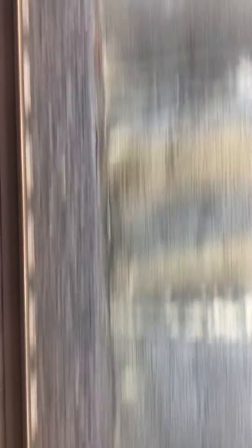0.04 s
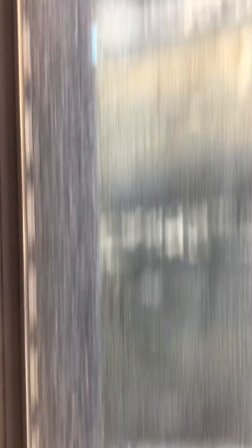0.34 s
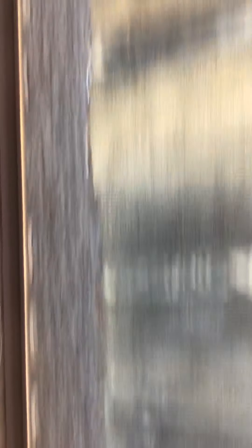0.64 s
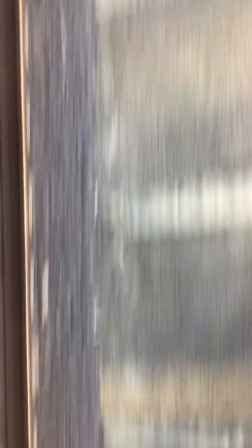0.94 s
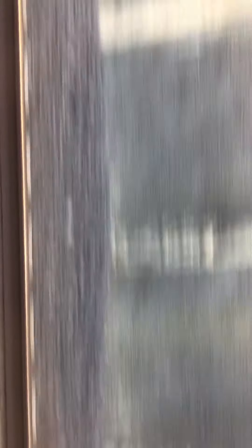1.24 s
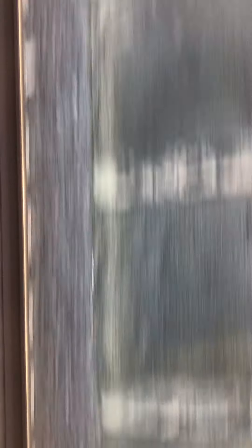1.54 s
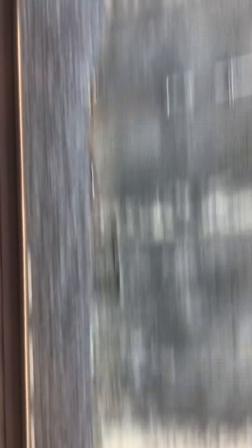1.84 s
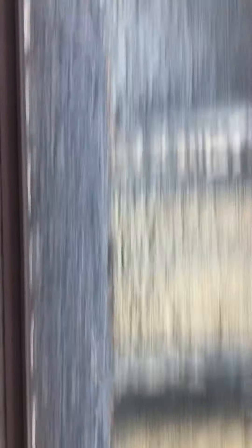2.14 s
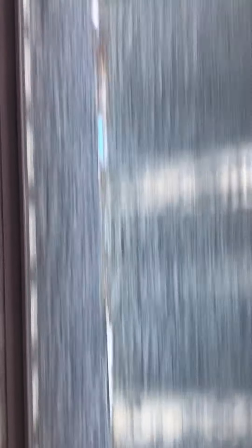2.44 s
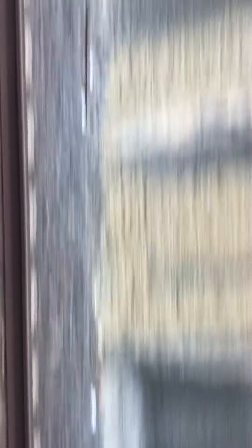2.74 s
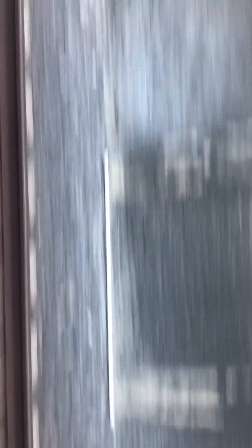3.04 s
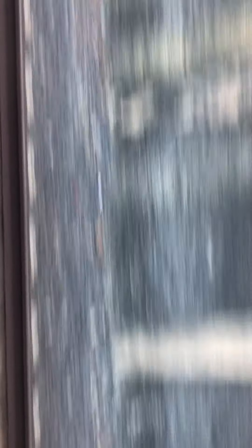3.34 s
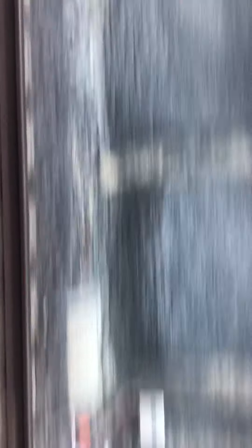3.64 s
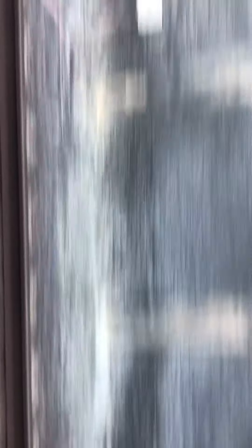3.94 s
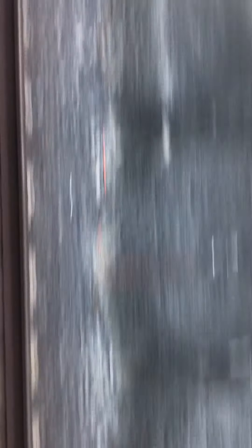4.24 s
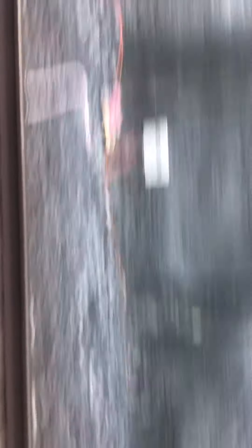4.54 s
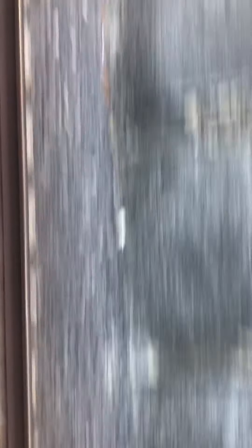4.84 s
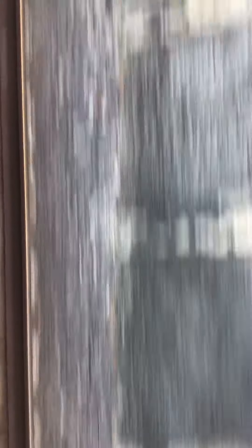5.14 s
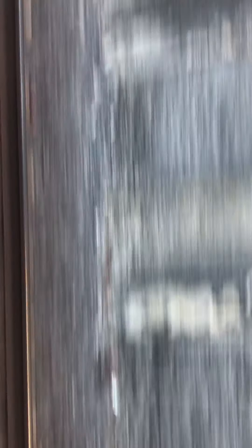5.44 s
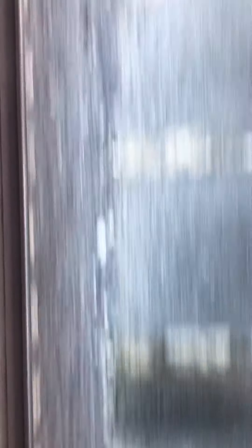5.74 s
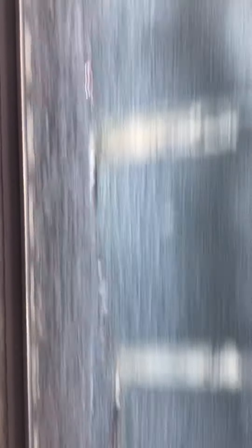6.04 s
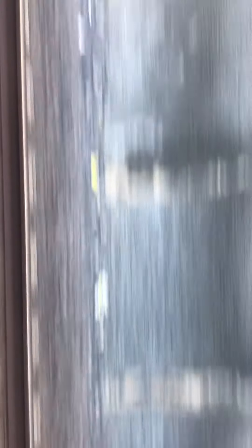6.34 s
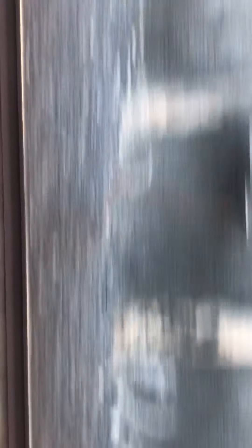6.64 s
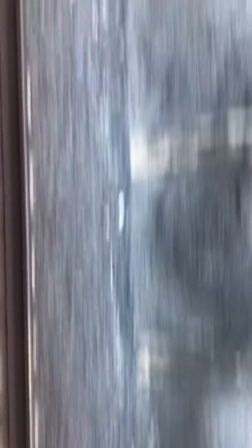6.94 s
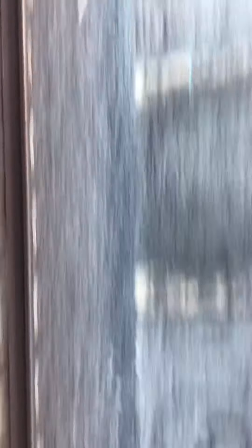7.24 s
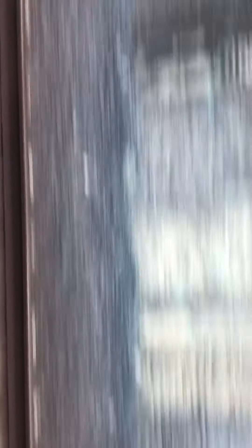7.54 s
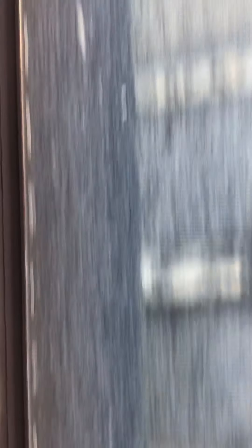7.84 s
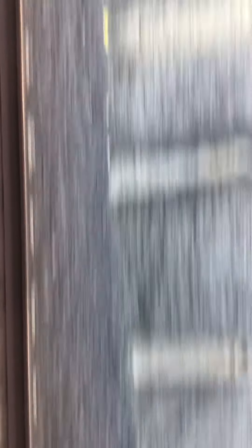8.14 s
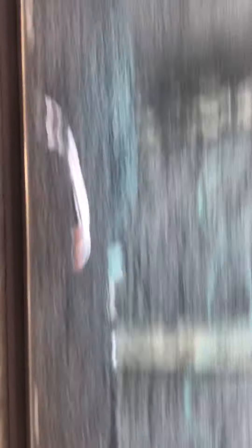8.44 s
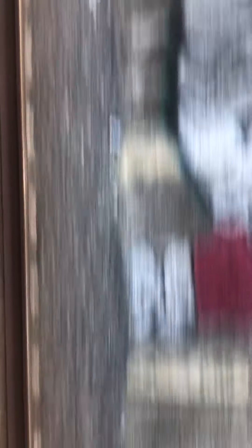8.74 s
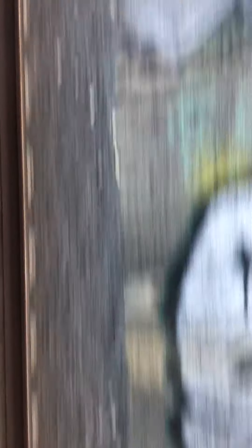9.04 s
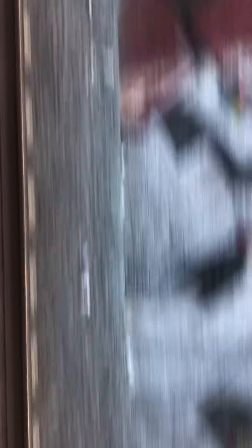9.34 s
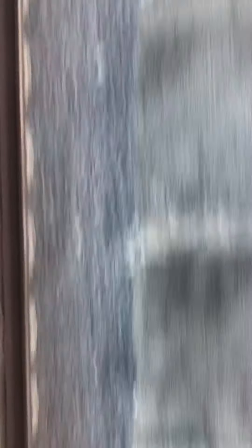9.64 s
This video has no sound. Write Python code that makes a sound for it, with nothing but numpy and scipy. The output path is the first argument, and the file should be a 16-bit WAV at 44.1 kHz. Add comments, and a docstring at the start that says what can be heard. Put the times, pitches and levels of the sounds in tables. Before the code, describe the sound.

Inside an electric train running at speed, the carriage booms and rumbles with a low, uneven throb. Wheels and rails roar steadily through the window with a light hiss, and dull knocks come now and then from under the floor. The steel wheels ring softly and sing brief notes where they rub, while the drive gears whine faintly behind. The microphone is at a window seat.

```python
"""Inside an electric train running at speed beside a stone wall, one microphone at a window seat.
Close all round, uneven track shakes the car body into a low boom and rumble, and from under the floor
come a few dull knocks of the bogie. Wheels and rails roar through the window, the steel wheels ring
and now and then sing where they rub, and far back in the sound the drive gears whine faintly."""
import sys
import numpy as np
from scipy import signal
from scipy.fft import rfft, irfft, next_fast_len
from scipy.io import wavfile
from scipy.ndimage import uniform_filter1d

SR = 44100
rng = np.random.default_rng(int(sys.argv[2]) if len(sys.argv) > 2 else 0)


def materialize(psi):
    """Save the field psi as 16-bit PCM at rate SR to the path in sys.argv[1].

    A 1-D psi becomes a single channel; in a 2-D psi each row is a channel.
    """
    bounded = np.clip(np.atleast_2d(psi).T, -1, 1)
    quanta = np.round(bounded * 32767).astype(np.int16)
    wavfile.write(sys.argv[1], SR, quanta)


N = 431738

# unevenness of the track under the car: t/s, level/dB about its mean
TRACK_UNEVENNESS = [(0, -1.5), (0.35, 0.5), (0.7, 0), (0.95, 2.5), (1.6, -2), (2.25, 1.5), (3.2, -1.5),
                    (3.55, -0.5), (4.2, 0), (4.9, 1), (5.7, 0), (6.8, -2), (7.15, 0.5), (7.8, 0.5),
                    (8.0, 0), (8.55, 0.5), (9.55, -1), (9.75, 4.5)]
# slow sway of the car on its springs: t/s, boom level/dB on average track
CAR_SWAY = [(0.0, -24), (1.6, -21), (3.2, -22), (5.2, -23.5), (6.0, -25), (7.3, -24.5), (8.0, -22),
            (9.2, -21), (9.75, -28.5)]
# brief swells and sags in boom, floor rumble and panel drone: t/s, boom/dB, floor/dB, panels/dB
BRIEF_SWELLS = [(0.2, 3.5, 5, 2), (0.88, 0, -0.5, 3.5), (0.99, 3, 3, 4), (1.1, 0.5, 2.5, 2),
                (1.47, 3.5, 0.5, 1.5), (1.85, 2.5, 1, -1), (3.55, 7.5, 2.5, -1.5), (3.77, 6, 2, 1.5),
                (4.02, 3.5, 1, 1), (4.46, -0.5, 2, 1), (4.58, 0, 3.5, 3.5), (4.84, 1, 2, -1.5),
                (4.95, 5, 3.5, 0.5), (5.14, -1.5, -1, -2), (5.47, 5, -1, 1), (6.25, 2, 0.5, 2),
                (7.27, 1, 2, 0), (7.94, 4.5, 3.5, -3), (8.09, 2, 0, -1.5), (8.42, 5, 0, 1),
                (8.52, -8, 6.5, 0), (8.63, 3.5, 2.5, -3), (8.86, 6, -2, -3), (9.27, 4.5, 2.5, 2.5),
                (9.69, 0, 2, -2), (9.77, 6, -0.5, 5.5)]
# moments when the shaking lets up: t/s, boom drop/dB, floor drop/dB
LULLS = [(0.5, 0, 2), (0.73, 6, 2.5), (1.25, 6, -3.5), (1.67, 7, -0.5), (2.05, 1, 2.5), (2.57, 1, 3.5),
         (3.15, 2, 5.5), (4.15, 9, 0.5), (4.38, 2, 5), (4.68, 0.5, 2), (5.03, 0.5, 0), (5.31, 5, 2.5),
         (6.62, 2.5, 3.5), (6.94, -1, 4.5), (7.12, 10, -2), (7.85, 5, 11), (8.3, 7, 0.5), (8.74, 4, 0),
         (9.41, 4.5, -0.5)]
# spectra of the shell around the microphone, the floor below, the panels beside it: f/Hz, level/dB
SHELL_SPECTRUM = [(10, -46.5), (16, -22.5), (21, -6.5), (28, -2.5), (42, -0.5), (52, 0), (57, -6),
                  (70, -38)]
FLOOR_SPECTRUM = [(48, -27), (57, -11.5), (63, 0.5), (78, -0.5), (104, -3.5), (120, -7.5), (134, -10.5),
                  (148, -18), (172, -40), (300, -59.5)]
PANEL_SPECTRUM = [(105, -23), (138, 2.5), (148, 3), (160, 1.5), (185, -0.5), (235, -4.5), (300, -4.5),
                  (365, -11), (400, -15), (520, -41.5)]
# resonances that stand out of each: f/Hz, width/Hz, lift/dB
SHELL_MODES = [(25.8, 2.6, 5.5), (31.8, 2.1, 9.5), (45.9, 3.2, 8), (52.1, 7.3, 5)]
FLOOR_MODES = [(90.4, 4.6, 3.5), (113.6, 7, 4.9), (130.6, 4, 7)]
PANEL_MODES = [(186, 33, 3.1), (282.6, 18, 3.7), (337, 14, 3.4)]

def car_body(floor_level_db=-22.5, panel_level_db=-33.5, swell_half_s=0.05, lull_half_s=0.055):
    """All round the seat: the track shakes shell, floor and wall panels; their beating modes throb."""
    (track_db,), (sway_db,) = in_time(TRACK_UNEVENNESS), in_time(CAR_SWAY)
    boom_swell, floor_swell, panel_swell = swells(BRIEF_SWELLS, swell_half_s)
    boom_lull, floor_lull = swells(LULLS, lull_half_s)
    shaking_db = 0.5 * drift(rate_hz=6)
    # each part follows its own share of the track's swing
    boom_db = sway_db + 0.99 * track_db + boom_swell - boom_lull + shaking_db
    floor_db = floor_level_db + track_db + floor_swell - floor_lull + shaking_db
    panel_db = panel_level_db + 0.81 * track_db + panel_swell
    boom = from_db(boom_db) * steady(vibration(SHELL_SPECTRUM, SHELL_MODES), span_s=0.2)
    floor = from_db(floor_db) * steady(vibration(FLOOR_SPECTRUM, FLOOR_MODES), span_s=0.28)
    panels = from_db(panel_db) * steady(vibration(PANEL_SPECTRUM, PANEL_MODES), span_s=0.17)
    return boom + floor + panels


# spectra of rail roar and wheel hiss, from inside the window: f/Hz, level/dB
RAIL_SPECTRUM = [(260, -27.5), (380, 0.5), (450, 3.5), (520, -1.5), (700, 0.5), (900, 0.5), (1040, -3),
                 (1110, -5), (1350, -6), (1570, -9.5), (1750, -27), (2500, -49)]
WHEEL_SPECTRUM = [(1100, -34), (1600, -1.5), (1720, 0), (2050, -2.5), (2400, -5), (2800, -7), (3050, -10.5),
                  (4100, -13.5), (5050, -16), (5900, -16), (6500, -19), (7000, -25), (7400, -31),
                  (9000, -64.5)]
# resonances that stand out of each: f/Hz, width/Hz, lift/dB
RAIL_MODES = [(404, 13, 1.3), (430, 23, 1.5), (540, 16, 2.5), (638, 28, 2.6), (676, 16, 1.3),
              (960, 38, 2.3), (1050, 27, 3.2), (1208, 18, 4), (1278, 30, 2.8), (1440, 26, 2.6)]
WHEEL_MODES = [(1810, 85, 3.5), (1933, 100, 3), (2185, 84, 2.4), (2596, 60, 3.3), (2697, 74, 6),
               (3500, 200, 5), (3700, 170, 4.6), (4420, 280, 5.2), (4690, 110, 3), (5450, 300, 2.2),
               (5800, 200, 1.9)]
# short rough patches of rail that swell the roar: t/s, lift/dB
ROUGH_PATCHES = [(0.98, 2), (2.58, 3), (3.99, 3), (7.27, 1.6), (9.13, 1.5), (9.78, 2.5)]
# wheel hiss at the seat: t/s, level/dB
WHEEL_HISS = [(0.0, -43.5), (0.55, -44), (0.95, -43), (1.7, -43.5), (2.55, -42.5), (4.1, -42.6),
              (5.2, -43.5), (6.1, -43), (6.75, -44), (7.7, -43), (8.95, -43.5), (9.75, -43)]

def wheels_on_rails(rail_level_db=-37, track_share=0.18, flutter_db=0.45):
    """Through the window: roughness at the contact excites rail and wheel, so both flutter in step."""
    (track_db,), (hiss_db,) = in_time(TRACK_UNEVENNESS), in_time(WHEEL_HISS)
    (patch_db,) = swells(ROUGH_PATCHES, half_s=0.04)
    contact_db = flutter_db * drift(rate_hz=14)
    rail_db = rail_level_db + track_share * track_db + patch_db
    roar = from_db(rail_db) * steady(vibration(RAIL_SPECTRUM, RAIL_MODES), span_s=0.25)
    hiss = from_db(hiss_db) * steady(vibration(WHEEL_SPECTRUM, WHEEL_MODES), span_s=0.27)
    return from_db(contact_db) * (roar + hiss)


# flaws in the rail passing under the bogie: t/s, push level/dB, contact time/s
RAIL_FLAWS = [(0.212, -20, 0.0032), (0.631, -22.5, 0.0026), (0.829, -24, 0.003), (0.872, -20.5, 0.0046),
              (0.948, -20, 0.0044), (1.058, -19.5, 0.0028), (1.162, -21.5, 0.0046), (1.484, -22, 0.0038),
              (2.125, -20, 0.0046), (2.205, -17, 0.0059), (3.52, -16.5, 0.0039), (4.457, -21, 0.0018),
              (4.538, -28, 0.0016), (4.572, -28, 0.0014), (4.607, -25, .0034), (6.068, -17.5, 0.0032),
              (6.404, -19, .005), (6.465, -18, 0.0052), (7.083, -18, 0.0053), (8.231, -24, .003),
              (8.515, -23.5, .003), (9.016, -14, 0.0066), (9.65, -20, .0042), (9.756, -15.5, 0.004)]
# what a knock rings with: f/Hz, level/dB relative to the push, t60/s
BOGIE_MODES = [(162, -10.5, 0.2), (179, -7, 0.19), (210, -5, 0.13), (241, -3, 0.09), (287, -7.5, 0.06),
               (332, -17.5, .12)]

def bogie_knocks(scatter_db=2.0):
    """Under the floor: each flaw strikes the bogie's modes, duller the longer the contact."""
    chance_db = rng.normal(0, scatter_db, (len(RAIL_FLAWS), len(BOGIE_MODES)))
    out = np.zeros(N)
    for k, (hz, mode_db, t60) in enumerate(BOGIE_MODES):
        force = np.zeros(N)
        for (s, push_db, contact_s), luck_db in zip(RAIL_FLAWS, chance_db[:, k]):
            push, start = np.hanning(int(contact_s * SR)), int(s * SR)
            force[start:start + len(push)] += from_db(push_db + mode_db + luck_db) * push / push.sum()
        out += ring(force, hz, t60)
    return out


# brief notes of wheels rubbing on the rail: t/s, half length/s, f/Hz, level/dB
WHEEL_NOTES = [(0.88, .12, 443, -47), (1.64, .07, 447, -47), (1.903, 0.08, 445, -43.5),
               (2.583, 0.083, 442, -40), (2.56, .14, 700, -49), (2.95, 0.37, 952, -50),
               (3.427, 0.11, 546, -47), (3.5, .25, 960, -50), (4.2, .22, 687, -51), (5.5, 0.18, 667, -51),
               (5.95, .25, 950, -52), (7.2, .2, 663, -52.5), (8.15, 0.2, 686, -49), (9.13, .14, 406, -46),
               (9.218, .15, 1040, -51)]

def wheel_sings(waver_share=0.005):
    """Outside, down at the rail: a rubbing wheel locks onto one wavering note that swells and dies."""
    t = np.arange(N) / SR
    wavering_t = np.cumsum(1 + waver_share * drift(rate_hz=15)) / SR
    out = np.zeros(N)
    for s, half_s, hz, level_db in WHEEL_NOTES:
        near = np.abs(t - s) < 3 * half_s
        envelope = from_db(level_db) * np.exp(-((t[near] - s) / half_s) ** 2)
        out[near] += envelope * np.sqrt(2) * np.sin(2 * np.pi * (hz * wavering_t[near] + rng.random()))
    return out


# whine at the seat as the load on the gears changes: t/s, f/Hz, level/dB
GEAR_WHINE = [(0.0, 488.4, -58), (0.28, 490.7, -47), (0.53, 489.8, -43.5), (0.72, 490.1, -50),
              (0.9, 490.2, -40), (1.05, 490, -54), (1.22, 489, -47), (1.45, 489.2, -58),
              (2.05, 487.6, -55.5), (2.3, 494.1, -40.5), (2.5, 491, -50.5), (3.0, 490.6, -48.5),
              (3.6, 489.4, -55.5), (4.0, 488, -49), (4.3, 487, -60), (4.52, 487.4, -46), (4.8, 485, -57),
              (4.96, 484.6, -43), (5.14, 487, -44), (5.5, 487.7, -51.5), (5.76, 486.8, -52),
              (5.9, 490.5, -39), (6.12, 489, -55.5), (6.4, 488, -46.5), (6.8, 487, -49.5),
              (7.1, 486.6, -50.5), (7.65, 485, -43.5), (7.87, 485.8, -58), (8.07, 483.7, -44.5),
              (8.3, 488, -48), (8.8, 488.3, -46.5), (9.22, 489.4, -47), (9.46, 488, -40), (9.62, 489, -47),
              (9.77, 488, -39.5)]

def gear_whine(waver_hz=4.5, flicker_db=4.0):
    """Faint behind the roar: one tone from the meshing teeth, wavering in pitch and strength."""
    pitch_hz, load_db = in_time(GEAR_WHINE)
    phase = 2 * np.pi * np.cumsum(pitch_hz + waver_hz * drift(rate_hz=19)) / SR
    flicker = from_db(flicker_db * drift(rate_hz=9.7))
    return from_db(load_db) * steady(flicker * np.sin(phase), span_s=0.2)


# lightly damped modes of the wheel discs: f/Hz, width/Hz, level/dB
DISC_MODES = [(1796, 10, -60.5), (1839, 22, -59), (1895, 20, -63), (1945, 18, -63.5), (2676, 23, -62),
              (3390, 12, -65.5), (3465, 14, -67.5), (3490, 16, -68), (4410, 24, -71), (4450, 16, -70.5),
              (6285, 36, -76)]

def wheel_ring(swell_db=0.5):
    """Farthest back: rolling keeps the steel discs ringing, each mode swelling a little on its own."""
    out = np.zeros(N)
    for centre, width, level_db in DISC_MODES:
        tone = coloured_noise(lambda hz: -20 * np.log10(1 + ((hz - centre) / width) ** 2))
        out += from_db(level_db + swell_db * drift(rate_hz=1.2)) * steady(tone, span_s=0.4)
    return out


def from_db(db):
    """Decibels to gain."""
    return 10 ** (np.asarray(db) / 20)


def rms_one(x):
    """Scale to unit rms."""
    return x / np.sqrt(np.mean(x ** 2) + 1e-20)


def in_time(rows):
    """One value per sample for each column after t/s."""
    times, *columns = np.transpose(rows)
    return [np.interp(np.arange(N) / SR, times, column) for column in columns]


def swells(rows, half_s):
    """For each dB column after t/s, a curve with a bell-shaped rise around every listed time."""
    t = np.arange(N) / SR
    times, *columns = np.transpose(rows)
    bells = [np.exp(-np.minimum(((t - s) / half_s) ** 2, 20)) for s in times]
    return [sum(db * bell for db, bell in zip(column, bells)) for column in columns]


def coloured_noise(gain_db_at):
    """Noise of unit rms whose spectrum in dB is the given function of frequency."""
    size = next_fast_len(N, real=True)
    hz = np.maximum(np.fft.rfftfreq(size, 1 / SR), 1)
    spectrum = rfft(rng.standard_normal(size)) * from_db(gain_db_at(hz))
    return rms_one(irfft(spectrum, size)[:N])


def drift(rate_hz):
    """Random wander of unit rms, mostly slower than rate_hz."""
    return coloured_noise(lambda hz: -20 * np.log10(1 + (hz / rate_hz) ** 2))


def vibration(spectrum, modes):
    """A structure shaken at random: a broad spectrum, lifted around each resonance; unit rms."""
    points_hz, points_db = np.transpose(spectrum)

    def response_db(hz):
        broad = np.interp(np.log(hz), np.log(points_hz), points_db, right=-np.inf)
        return broad + sum(lift / (1 + (2 * (hz - centre) / width) ** 2) for centre, width, lift in modes)
    return coloured_noise(response_db)


def steady(x, span_s):
    """Even out swells slower than span_s and keep the fast flutter; unit rms."""
    power = uniform_filter1d(x ** 2, int(span_s * SR))
    return rms_one(x / np.sqrt(np.abs(power) + 1e-9))


def ring(force, hz, t60):
    """One damped mode: a unit push sets a sine of height 1 ringing."""
    decay, step = from_db(-60 / (t60 * SR)), 2 * np.pi * hz / SR
    return signal.lfilter([0, np.sin(step)], [1, -2 * decay * np.cos(step), decay ** 2], force + 1e-18)


def scene():
    """Everything as it reaches the window seat, in mono."""
    mix = car_body() + bogie_knocks() + wheels_on_rails() + wheel_ring() + wheel_sings() + gear_whine()
    return mix[None, :]


def record(dry, low_cut_hz=15, high_cut_hz=7400):
    """The microphone loses the slowest pressure swings; the top is cut steeply."""
    picked_up = signal.sosfilt(signal.butter(2, low_cut_hz, "high", fs=SR, output="sos"), dry)
    return signal.sosfilt(signal.ellip(12, 0.1, 90, high_cut_hz, fs=SR, output="sos"), picked_up)


dry = scene()
out = record(dry)
materialize(out)
```